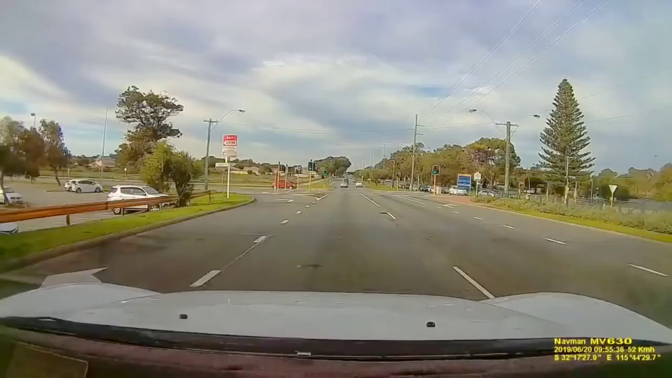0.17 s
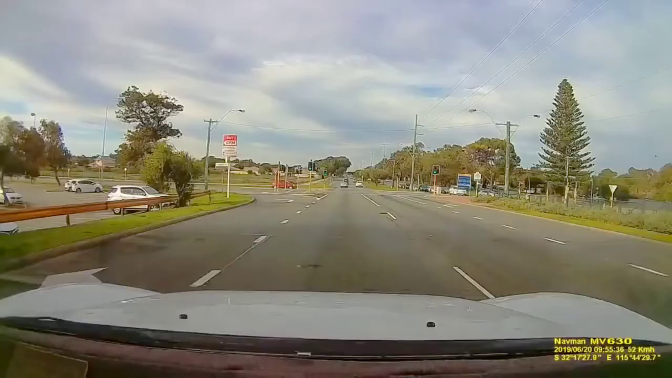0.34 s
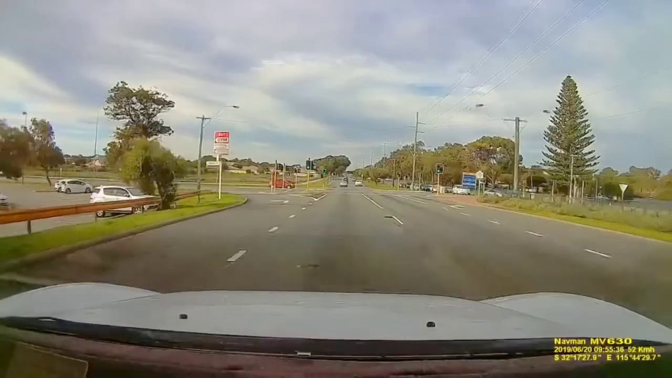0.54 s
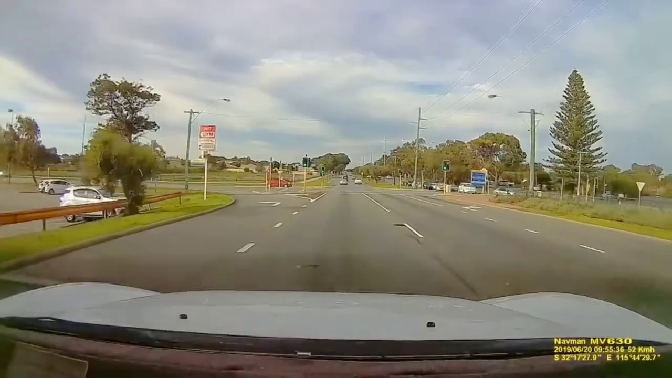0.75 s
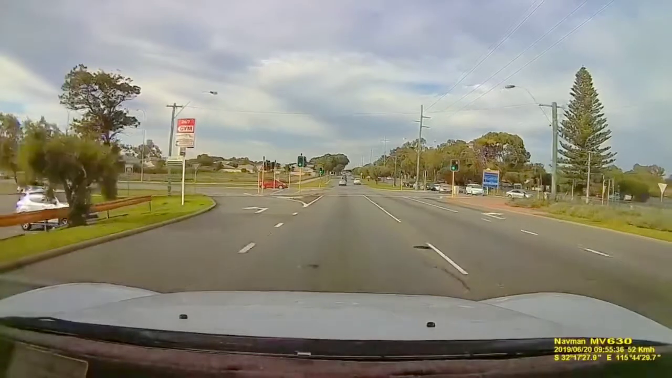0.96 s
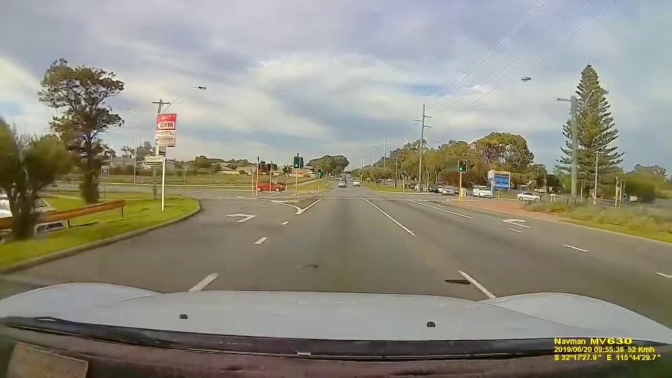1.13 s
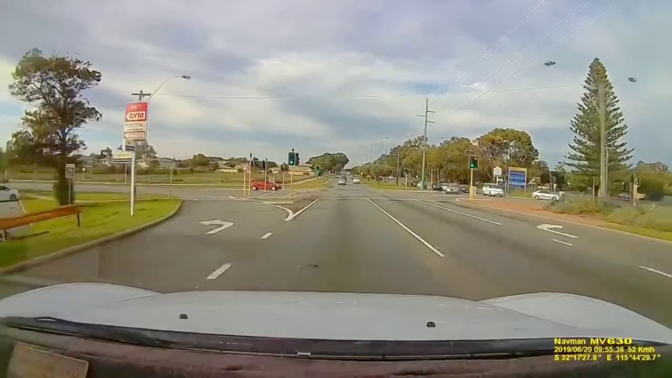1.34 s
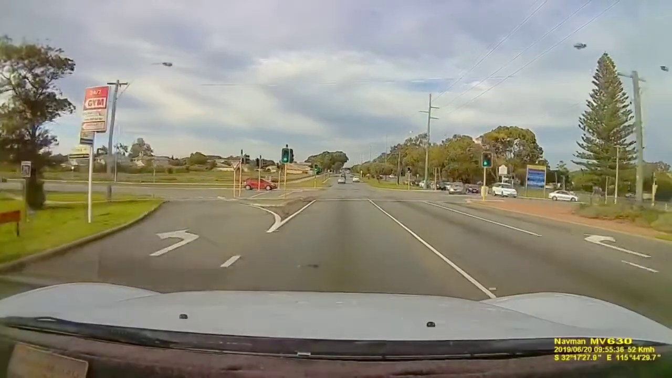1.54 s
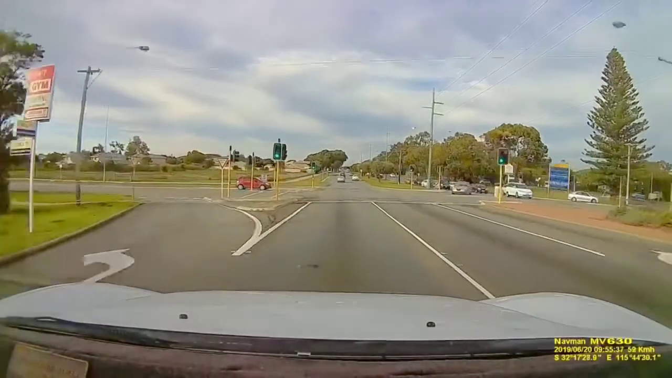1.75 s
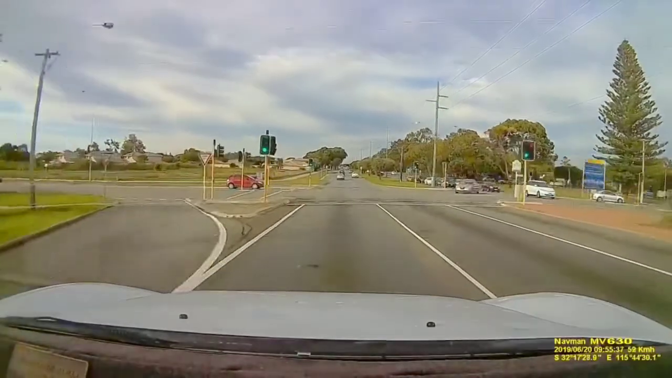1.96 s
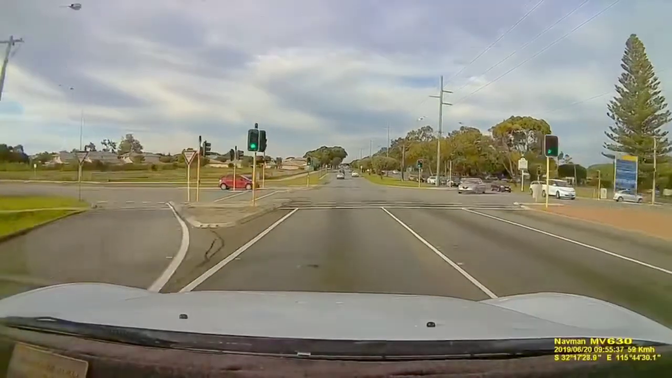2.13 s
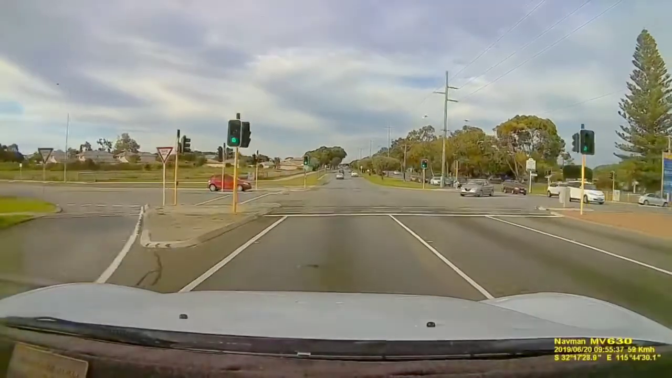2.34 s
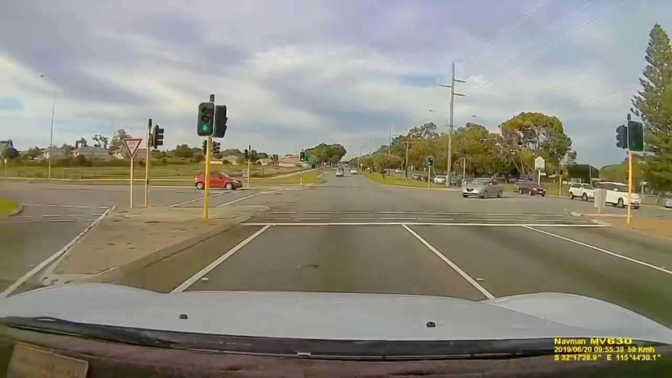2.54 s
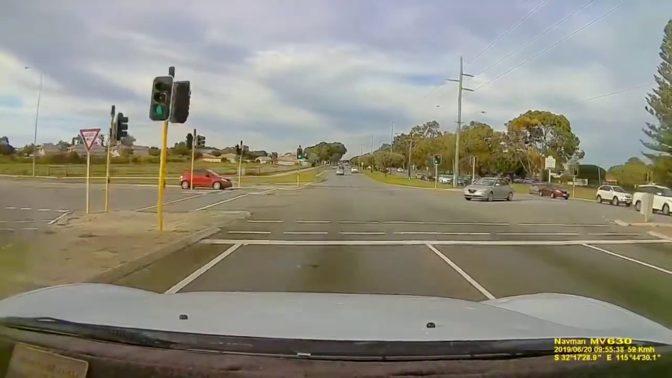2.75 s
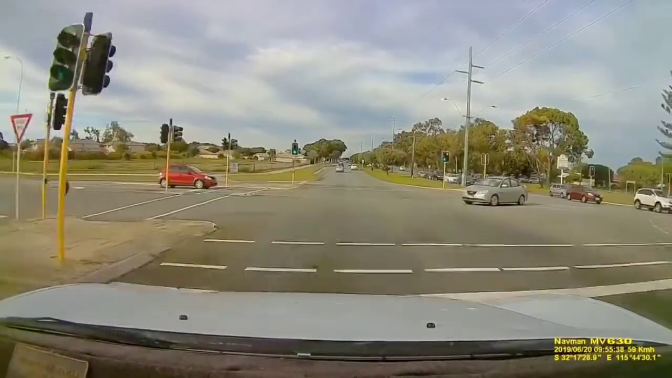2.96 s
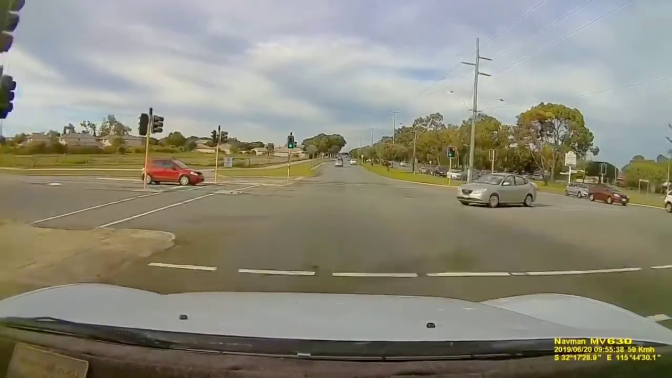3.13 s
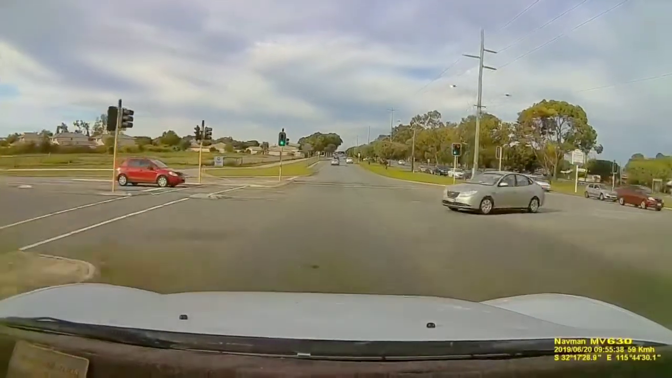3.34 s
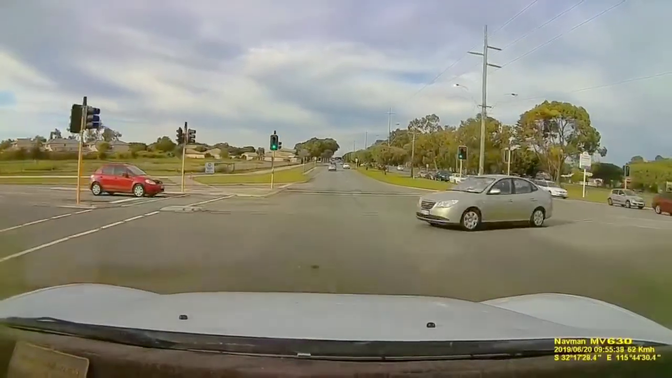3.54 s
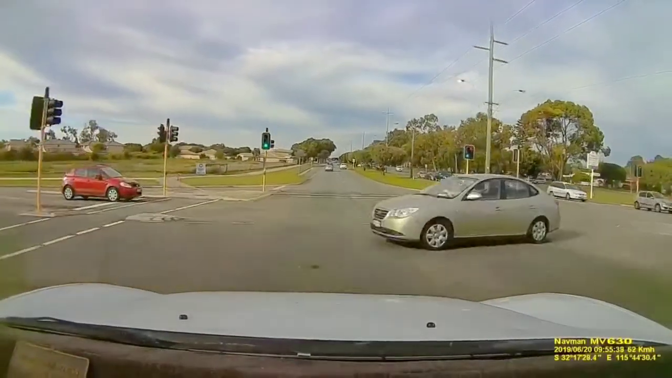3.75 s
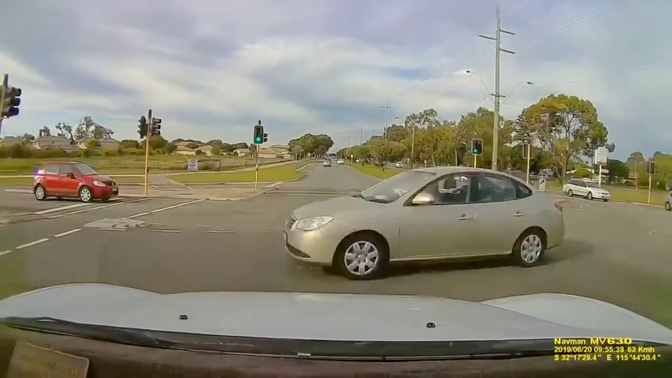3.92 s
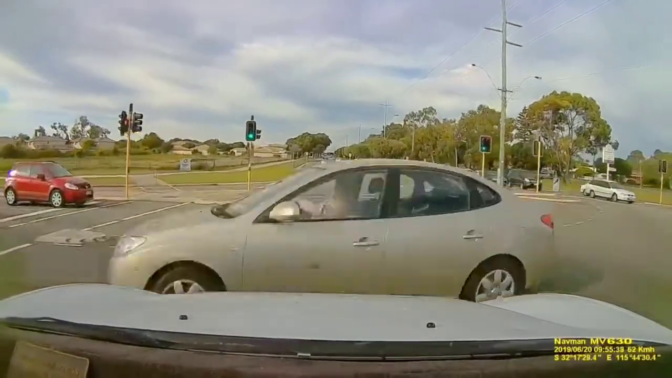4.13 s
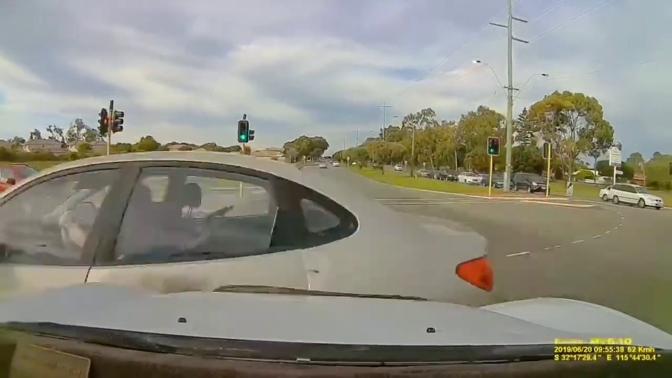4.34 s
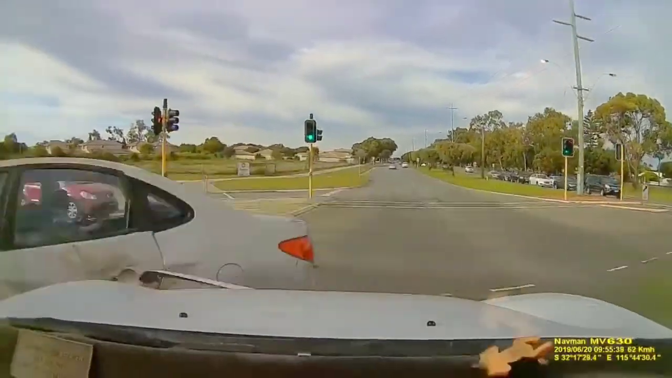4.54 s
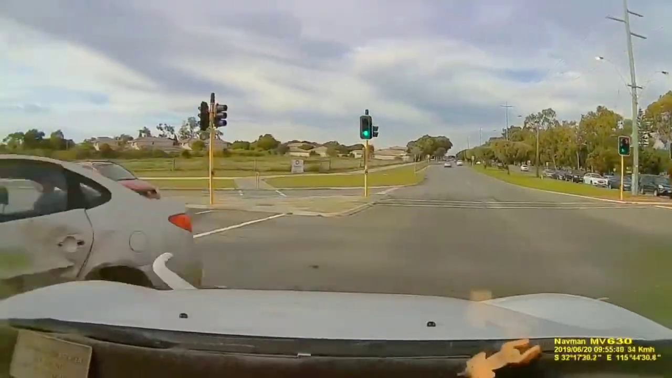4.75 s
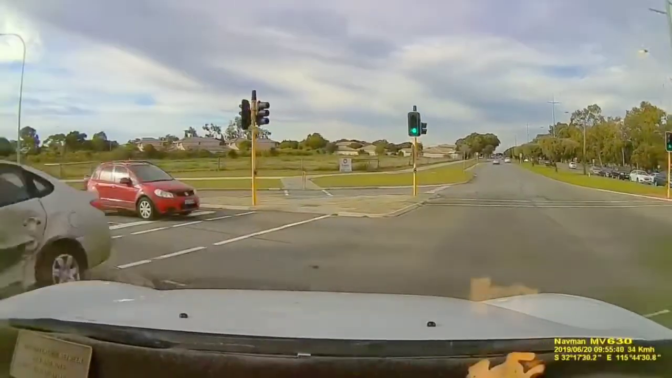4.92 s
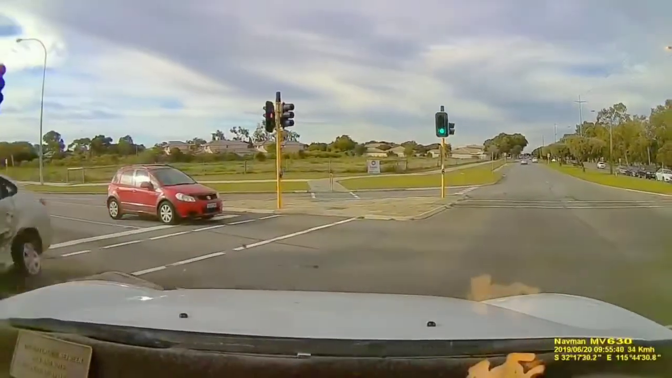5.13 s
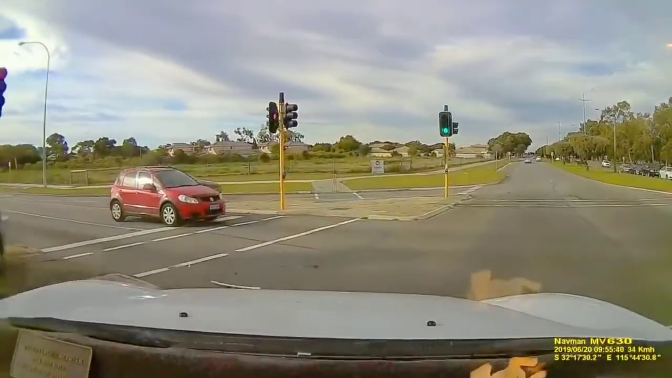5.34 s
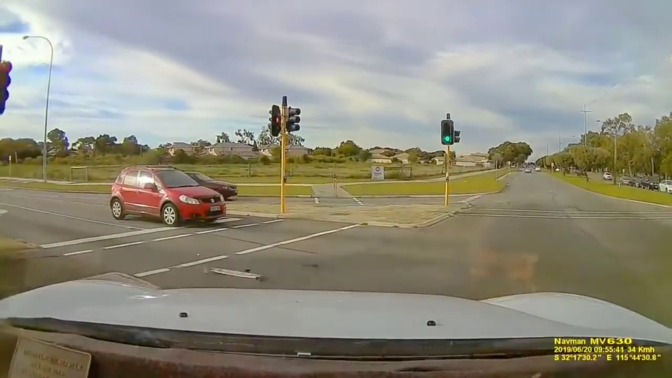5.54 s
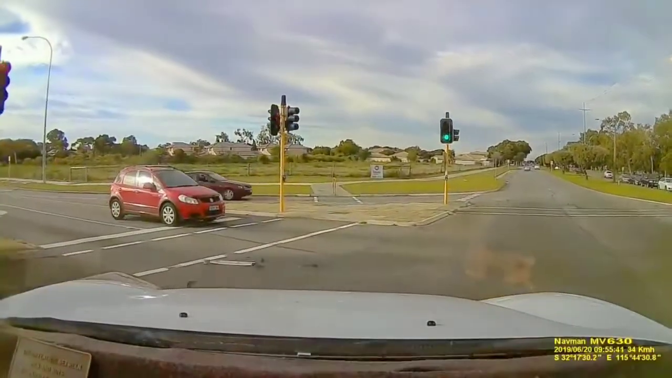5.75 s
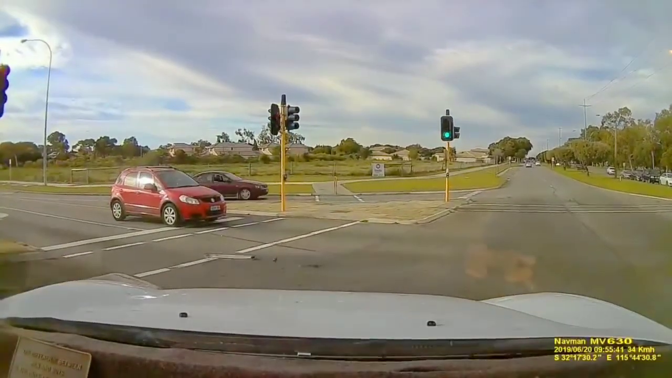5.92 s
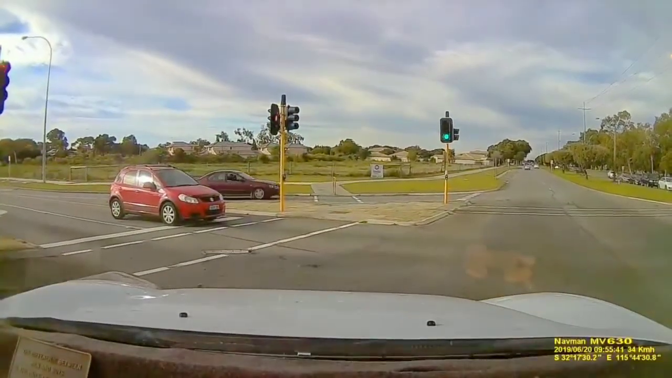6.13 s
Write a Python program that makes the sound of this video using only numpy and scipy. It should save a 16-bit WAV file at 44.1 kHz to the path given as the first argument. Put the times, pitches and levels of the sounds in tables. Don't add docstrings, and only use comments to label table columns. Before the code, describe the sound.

Inside a moving car, low road roar gives way to juddering brakes and squealing tyres, then a violent overloading crash, crumpling metal and settling rattles.

```python
import sys
import numpy as np
from scipy import signal
from scipy.fft import rfft, irfft, next_fast_len
from scipy.io import wavfile
from scipy.ndimage import uniform_filter1d, map_coordinates

SR = 44100
rng = np.random.default_rng(int(sys.argv[2]) if len(sys.argv) > 2 else 0)


def file_out(sig):
    cols = np.atleast_2d(sig).T
    lim = np.clip(cols, -1, 1)
    pcm = np.round(lim * 32767).astype(np.int16)
    wavfile.write(sys.argv[1], SR, pcm)


def gain_from_decibels(decibels):
    exponent = np.asarray(decibels, float) / 20
    return 10 ** exponent


N = 272641
T = np.arange(N) / SR


def unit(x):
    return x / np.sqrt(np.mean(x ** 2) + 1e-20)


def along(points, hz):
    f, db = np.transpose(points)
    return gain_from_decibels(np.interp(np.log(hz + 1), np.log(f + 1), db))


def curves(rows):
    s, db, *rest = np.transpose(rows)
    level = gain_from_decibels(np.interp(T, s, db, -150, -150))
    return [level] + [np.interp(T, s, column) for column in rest]


def wobble(rate):
    knots = rng.standard_normal(N // 100)
    return map_coordinates(knots, [T * min(rate, 400)])


def filtered(x, response):
    m = next_fast_len(len(x) + 8192)
    hz = np.fft.rfftfreq(m, 1 / SR)
    return irfft(rfft(x, m) * response(hz), m)[:len(x)]


def peak(f, hz, width_hz):
    return 1j * f * width_hz / (hz * hz - f * f + 1j * f * width_hz)


def patchy(depth_db):
    z = signal.stft(rng.standard_normal(N), nperseg=512)[2]
    field = uniform_filter1d(rng.standard_normal(z.shape), size=5, axis=0)
    field = uniform_filter1d(field, size=9, axis=1)
    return signal.istft(z * gain_from_decibels(depth_db * unit(field)), nperseg=512)[1][:N]


def gritty(lump_db, rate):
    lumps = gain_from_decibels(lump_db * np.clip(wobble(rate), -2, 2))
    return lumps * rng.standard_normal(N)


def place(out, s, piece):
    return out[round(s * SR):][:len(piece)]


def swell(s, db, rise_db, fall_db, held=0):
    to_come = np.maximum(s - T, 0)
    gone_by = np.maximum(T - s - held, 0)
    return gain_from_decibels(db - rise_db * to_come - fall_db * gone_by)


def swells(rows, rise_db, fall_db):
    return np.max([swell(s, db, rise_db, fall_db, held) for s, db, held in rows], axis=0)


# [f/Hz, level/dB]
WHINE_TONES = [(6385, -96), (8500, -85), (11025, -90)]


def whine():
    tones = sum(np.sqrt(2) * gain_from_decibels(db) * np.sin(2 * np.pi * hz * T) for hz, db in WHINE_TONES)
    return gain_from_decibels(3.3 * wobble(24.5)) * tones


# [t/s, level/dB]
ROAD_LEVEL = [
    (.45, -33.5),
    (2.5, -31),
    (3, -31.5),
    (3.6, -37),
    (5, -34.5),
    (5.4, -40),
    (5.75, -36),
    (5.85, -43.5),
    (6.19, -48),
]
# [f/Hz, level/dB per Hz]
ROAR_COLOUR = [(12, -40), (22, -9), (46, -1.5), (78, -13), (120, 0), (200, -2), (370, -4), (560, -6),
               (1150, -7.5), (1700, -18.5), (2000, -28.5), (2900, -37.5), (3500, -49.5), (13300, -54)]


def road():
    roar = unit(filtered(patchy(depth_db=1.5), lambda f: along(ROAR_COLOUR, f)))
    surface = gain_from_decibels(0.61 * wobble(7.08))
    return curves(ROAD_LEVEL)[0] * surface * roar


# [f/Hz, level/dB per Hz]
FLOOR_COLOUR = [(12, -37), (20, -8.5), (134, 3), (338, -2.5), (398, -6), (455, -4.5), (700, -10),
                (910, -28), (1540, -120)]
# [f/Hz, level/dB per Hz]
SPRING_COLOUR = [(12, -41), (20, -15.5), (155, -5), (262, -8.5), (343, -18), (500, -13), (650, -47),
                 (1100, -120)]
# [t/s, level/dB, held/s]
FLOOR_JOLTS = [
    (2.58, -38, 0.033),
    (2.8, -28.5, 0.036),
    (3.25, -23, 0.14),
    (3.38, -16.5, 0.064),
    (3.47, -16.5, 0.092),
    (3.67, -19.5, 0.044),
    (3.82, -26, 0.073),
    (4.08, -42, 0.12),
    (4.35, -29, 0.036),
    (4.45, -40, .02),
]
# [t/s, level/dB, held/s]
BODY_ROCKS = [
    (4.76, -20, 0.025),
    (4.9, -31, 0.057),
    (5.098, -33, .01),
    (5.22, -22, 0.025),
    (5.4, -39.5, 0.061),
    (5.63, -26, 0.025),
    (5.75, -46, .01),
    (5.916, -36.5, .01),
    (6.08, -58, .1),
]
SPRING_RISE_DB_S, SPRING_FALL_DB_S = 204, 176


def judder():
    shake = unit(filtered(gritty(lump_db=1.2, rate=70), lambda f: along(FLOOR_COLOUR, f)))
    rock = unit(filtered(gritty(lump_db=3.5, rate=36), lambda f: along(SPRING_COLOUR, f)))
    shake_level = swells(FLOOR_JOLTS, SPRING_RISE_DB_S, SPRING_FALL_DB_S)
    rock_level = swells(BODY_ROCKS, SPRING_RISE_DB_S, SPRING_FALL_DB_S)
    return gain_from_decibels(-4.0) * (shake_level * shake + rock_level * rock)


# [t/s, level/dB, f/Hz]
SKID_EFFORT = [
    (3.15, -40.5, 1050),
    (3.28, -29.5, 1280),
    (3.354, -20, 1361),
    (3.41, -26, 1143),
    (3.544, -21.5, 1280),
    (3.612, -25.5, 1230),
    (4.07, -25.5, 1063),
    (4.404, -25.5, 1235),
    (4.46, -27, 1105),
]
# [f/Hz, width/Hz, level/dB]
TREAD_MODES = [(755, 113, -3.5), (984, 107, 2.5), (1280, 204, 0.5), (1593, 242, -3)]


def skid():
    level, pitch_hz = curves(SKID_EFFORT)

    def tread(f):
        modes = sum((-1) ** k * gain_from_decibels(db) * peak(f, hz, w) for k, (hz, w, db) in enumerate(TREAD_MODES))
        return modes * peak(f, 1080, 1000)

    scrub = filtered(gritty(lump_db=1.26, rate=60), tread)
    smear = wobble(90) + 1j * wobble(90)
    squeal = np.real(smear * np.exp(2j * np.pi * np.cumsum(pitch_hz) / SR))
    return level * (gain_from_decibels(-2.0) * unit(scrub) + gain_from_decibels(-7) * unit(squeal))


# [t/s, length/s, level/dB, start f/Hz, end f/Hz]
TYRE_CHIRPS = [(3.281, 0.029, -24, 1324, 1276), (3.311, 0.032, -17, 1237, 1460),
               (3.337, 0.037, -19.5, 1410, 1905), (3.429, 0.045, -18.5, 1234, 1457),
               (3.445, 0.024, -28, 1810, 2130), (3.528, 0.041, -16, 1198, 1427),
               (3.86, 0.036, -20.5, 1264, 1150), (3.994, 0.087, -23.5, 1022, 950),
               (4.242, 0.034, -20.5, 1311, 1312), (4.3, 0.036, -24, 1290, 1320),
               (4.351, 0.041, -23, 1244, 1278)]


def chirps():
    out = np.zeros(N)
    hoarse = 1 + 0.6 * (wobble(260) + 1j * wobble(260))
    for s, length, db, from_hz, to_hz in TYRE_CHIRPS:
        u = np.arange(0, 1, 1 / (length * SR + 1))
        turns = length * (from_hz * u + (to_hz - from_hz) * u * u / 2)
        tone = np.real(place(hoarse, s, u) * np.exp(2j * np.pi * turns))
        arch = np.sqrt(np.abs(np.sin(np.pi * u)))
        place(out, s, u)[:] += gain_from_decibels(db - 4.5) * arch * tone
    return out


# [f/Hz, level/dB per Hz]
TRIM_COLOUR = [(1060, -12), (1800, -1.5), (2370, -4.5), (2850, -5.5), (3460, -15), (5130, -17), (6010, -17),
               (7600, -22.5), (12100, -18.5), (13300, -32)]
# [f/Hz, width/Hz, level/dB]
MOUNT_MODES = [(2860, 250, 2), (4430, 280, 2.5), (5870, 300, -6)]
# [t/s, level/dB, rise/dB per s, fall/dB per s]
TRIM_BUZZES = [
    (2.9, -73, 33, 20),
    (3.45, -42.5, 55, 33),
    (4.4, -61, 5.5, 60),
    (4.5, -26, 700, 43),
    (5.75, -59.5, 8.5, 300),
    (5.9, -66, 26, 13),
]
# [t/s, level/dB]
TRIM_SLAPS = [(2.6529, -44), (2.667, -38), (2.7494, -44), (2.7694, -49), (3.022, -42), (3.0929, -50),
              (3.1318, -35.5), (3.1597, -42), (3.284, -39), (3.314, -30), (3.3468, -31), (3.3994, -29),
              (3.4294, -34), (3.528, -22), (3.552, -29), (3.5894, -47), (3.6242, -54), (3.785, -26.5),
              (3.8694, -46), (4.0744, -57), (4.1144, -59), (4.2244, -43), (4.3494, -53), (5.2744, -43),
              (5.3961, -37), (5.5149, -30), (5.7328, -28), (6.1644, -49)]
SLAP_T60, SLAP_UNDER_DB = 0.072, 19.5


def rattle():
    def trim(f):
        mount = sum(gain_from_decibels(db) * peak(f, hz, w) for hz, w, db in MOUNT_MODES)
        return along(TRIM_COLOUR, f) * (1 + mount)

    buzz = unit(filtered(gritty(lump_db=2.5, rate=150), trim))
    slaps = np.zeros(N + SR)
    t = np.arange(SR // 5) / SR
    shaken = [(s, db + bright_db - SLAP_UNDER_DB) for s, db, hz, bright_db in SHELL_KNOCKS]
    for s, db in list(TRIM_SLAPS) + shaken:
        onset = 1 - np.exp(-t / 0.00094)
        place(slaps, s, t)[:] += gain_from_decibels(db - 7.5 - 60 * t / SLAP_T60) * onset
    buzzing = sum(swell(*row) for row in TRIM_BUZZES) * gain_from_decibels(3.5)
    return (buzzing + slaps[:N]) * buzz


# [f/Hz, level/dB per Hz]
SHELL_COLOUR = [(24, -65), (40, -33), (145, 2.5), (242, -7.5), (356, -3), (775, -7), (1120, -6.5),
                (1530, -9.5), (1730, -32.5), (2680, -23.5), (3760, -31), (4460, -29), (5040, -33),
                (5690, -35), (13300, -48.5)]
# [t/s, level/dB, held/s]
PANEL_FOLDS = [
    (4.503, -8.5, .005),
    (4.533, -9.5, 0.03),
    (4.63, -20, .01),
    (4.675, -11.5, 0.054),
    (4.74, -15, 0.0088),
    (4.85, -16, 0.041),
    (4.96, -21.5, 0.023),
    (5.215, -16, 0.006),
    (5.58, -26.5, 0.054),
]
FOLD_RISE_DB_S, FOLD_FALL_DB_S = 607, 315
# [t/s, level/dB, rise/dB per s, fall/dB per s]
WRECK_CREAK = (4.5, -16.5, 600, 28.5)


def crumple():
    fold = unit(filtered(gritty(lump_db=2.5, rate=150), lambda f: along(SHELL_COLOUR, f)))
    folding = swells(PANEL_FOLDS, FOLD_RISE_DB_S, FOLD_FALL_DB_S)
    return np.maximum(folding, swell(*WRECK_CREAK)) * fold


# [t/s, peak level/dB, ring f/Hz, brightness/dB]
SHELL_KNOCKS = [(3.379, -11, 1080, 7), (3.469, -10, 310, 1), (3.577, -8.5, 355, 3.5), (3.669, -14, 1400, 6),
                (3.703, -18, 614, -8), (3.732, -18.5, 546.2, -5), (4.632, 2, 1310, 5), (4.74, -9, 340, 5.5),
                (4.784, -8, 331, -2), (4.83, -0.5, 700, 3.5), (4.844, -2.5, 348, 2), (4.871, -0.5, 970, 6),
                (4.884, -1, 360, 2), (4.9, 0, 794, -2), (4.928, 2.5, 950, 3), (5.003, -11.5, 1060, 1),
                (5.093, -13.5, 1010, -6), (5.113, -7.5, 738, -0.5), (5.122, -7.5, 870, -9),
                (5.535, -14.5, 780, 3), (5.574, -18, 1310, 6), (5.611, -11, 620, -6),
                (5.619, -6.5, 1460, 4), (5.741, -16.5, 1200, -1), (5.856, -25.5, 732, -5),
                (5.896, -21.5, 650, -10), (5.934, -28.5, 339, -16), (6.047, -33, 450, -1),
                (6.109, -38, 716, -2), (4.452, -11.5, 900, 4)]
# [t/s, peak level/dB, f/Hz]
PART_PINGS = [(3.158, -39.5, 4830), (3.217, -37, 4900), (3.285, -30.5, 2910), (3.315, -30.5, 2910),
              (3.379, -28.5, 2880), (3.378, -31, 6000), (3.42, -37, 4850), (3.653, -15, 2484),
              (3.702, -17, 597), (3.73, -22.5, 550), (3.786, -33, 2430), (3.829, -24.5, 2550),
              (5.19, -37.5, 3800), (5.265, -38, 3800), (5.536, -33, 4080), (5.55, -24, 300),
              (5.575, -26, 2640), (5.618, -18.5, 2785), (5.64, -20.5, 950), (5.897, -22, 635),
              (5.915, -28, 646), (6.055, -34.5, 1330)]
KNOCK_T60, PING_T60 = 0.09, 0.051


def knocks():
    out = np.zeros(N + SR)
    t = np.arange(SR // 6) / SR
    for s, db, hz, bright_db in SHELL_KNOCKS:
        def tint(f):
            ring = 0.56 + 1.6 * peak(f, hz, 0.22 * hz)
            return along(SHELL_COLOUR, f) * ring * np.where(f > 1900, gain_from_decibels(bright_db), 1)

        burst = rng.standard_normal(len(t)) * gain_from_decibels(-60 * t / KNOCK_T60) * (1 - np.exp(-t / 0.0011))
        blow = filtered(burst, tint)
        place(out, s, t)[:] += gain_from_decibels(db - 2.0) * blow / np.abs(blow).max()
    for s, db, hz in PART_PINGS:
        decay = gain_from_decibels(db - 60 * t / PING_T60 * (hz / 2500) ** 0.37) * (1 - np.exp(-t / 0.002))
        beat = 1 + 0.63 * np.sin(2 * np.pi * 0.078 * hz * t + db)
        place(out, s, t)[:] += decay * np.sin(2 * np.pi * hz * t) * beat
    return out[:N]


# [from t/s, to t/s, jump meeting/full scale, jump leaving/full scale]
PINNED_SPANS = [(3.48, 3.4915, .14, .43), (3.4985, 3.5088, -.35, -.2), (3.5838, 3.5875, 0, 0),
                (3.6455, 3.6522, .3, 0), (3.6605, 3.6665, 0, 0), (4.4562, 4.475, .48, 1.44),
                (4.4756, 4.4787, -1.44, 1.3), (4.4795, 4.5022, -.3, -1), (4.5028, 4.503, 1.05, 0),
                (4.5049, 4.5322, -1.74, .7), (4.5348, 4.5518, -.23, .8), (4.5548, 4.6035, .8, -.5),
                (4.6055, 4.6315, .55, .3), (4.6374, 4.6675, .3, -.25), (4.687, 4.7085, .25, 0),
                (4.7222, 4.7362, .35, -.13), (4.752, 4.7565, -.18, 0), (5.208, 5.2125, 1.3, 0),
                (5.225, 5.2393, -.57, .34), (5.248, 5.2645, -.41, 0)]
MEET_S, LEAVE_S = 0.00052, 0.00035


def surges():
    jumps = [(start, meet, MEET_S) for start, end, meet, leave in PINNED_SPANS]
    jumps += [(end, leave, LEAVE_S) for start, end, meet, leave in PINNED_SPANS]
    slope = np.zeros(N)
    for s, jump, rise in jumps:
        ramp = np.ones(max(round(rise * SR), 1))
        place(slope, s, ramp)[:] += jump * ramp / len(ramp)
    b, a = signal.bessel(3, 150 / (SR / 2), "high")
    return signal.lfilter(b, a, np.cumsum(slope))


def unpinned():
    free = np.ones(N)
    for start, end, *jumps in PINNED_SPANS:
        free[round(start * SR):round(end * SR)] = 0
    return uniform_filter1d(free, size=9)


def scene():
    return (road() + judder() + skid() + chirps() + rattle() + crumple() + knocks())[None]


def top_cut(x):
    return signal.sosfilt(signal.butter(12, 13460, fs=SR, output="sos"), x)


def record(dry):
    x = (dry[0] + whine()) * unpinned() + surges()
    x = x / (1 + np.abs(x / 1.05) ** 6) ** (1 / 6)
    x = x * (T > 0.522)
    x = filtered(x, lambda f: np.where(f < 13400, 1, gain_from_decibels(-44)))
    return top_cut(x[None])


dry = scene()
out = record(dry)
file_out(out)
```